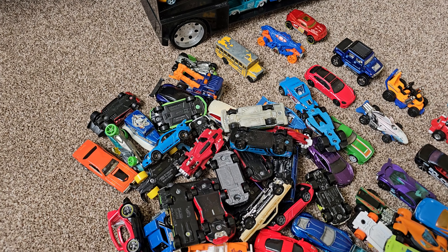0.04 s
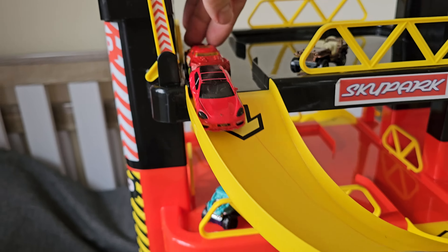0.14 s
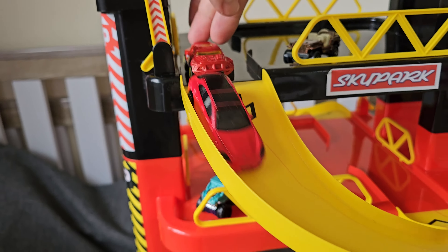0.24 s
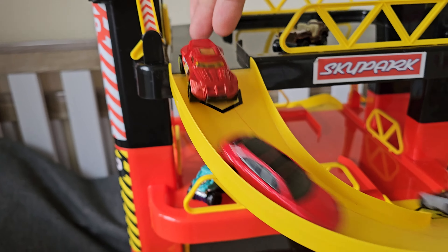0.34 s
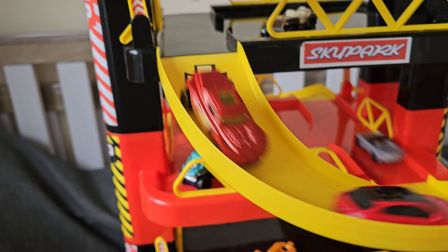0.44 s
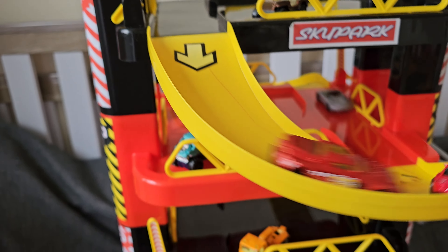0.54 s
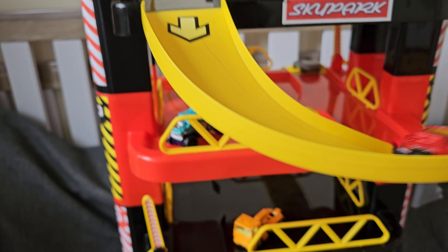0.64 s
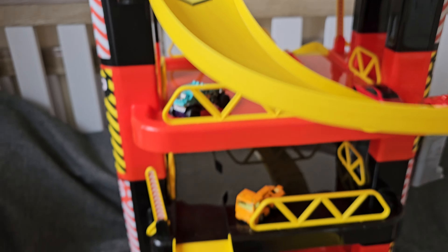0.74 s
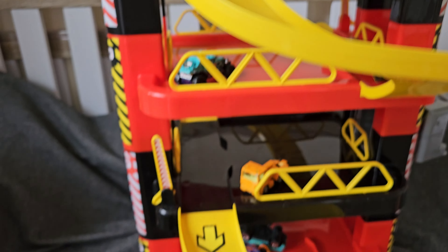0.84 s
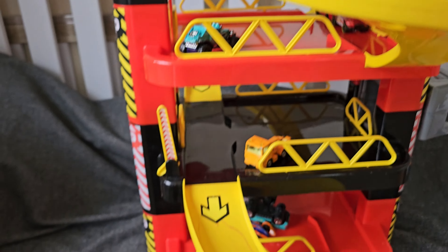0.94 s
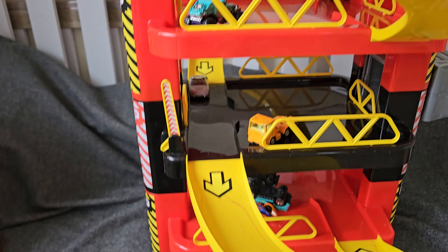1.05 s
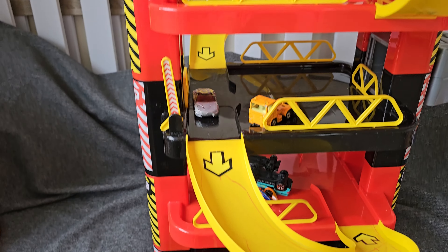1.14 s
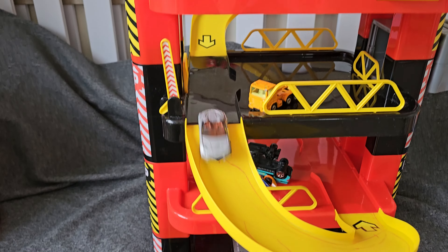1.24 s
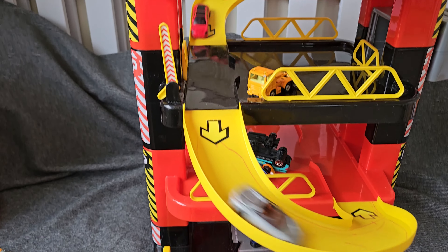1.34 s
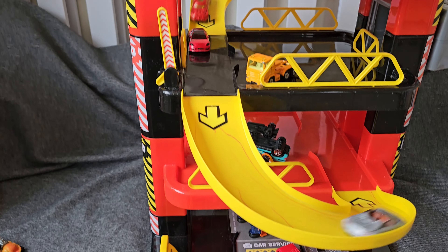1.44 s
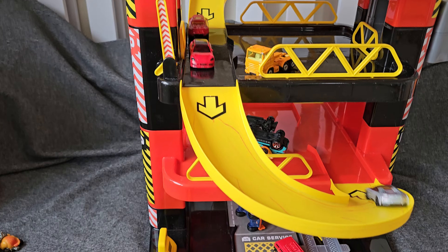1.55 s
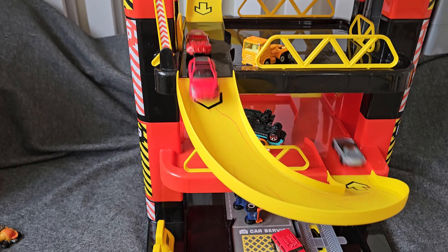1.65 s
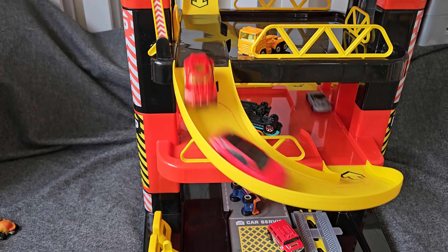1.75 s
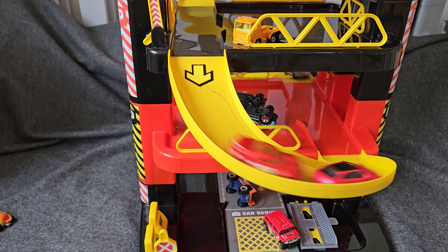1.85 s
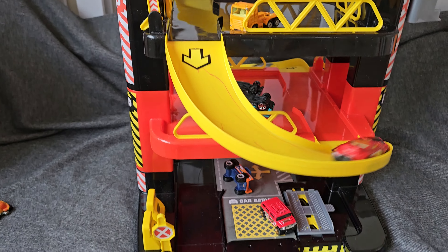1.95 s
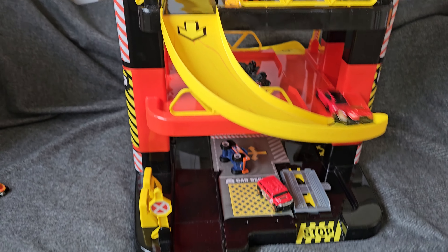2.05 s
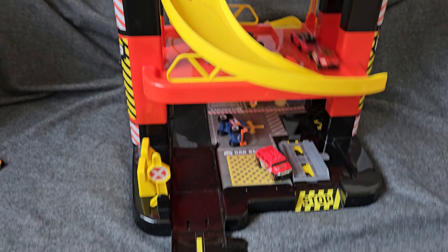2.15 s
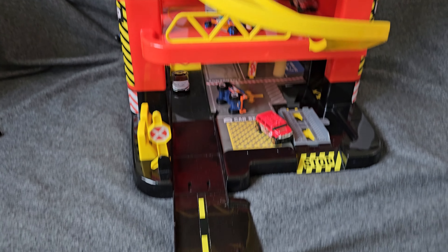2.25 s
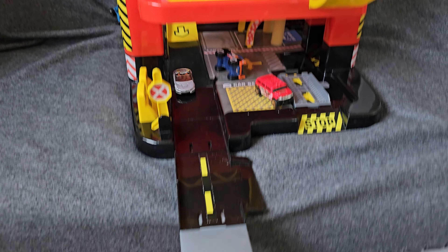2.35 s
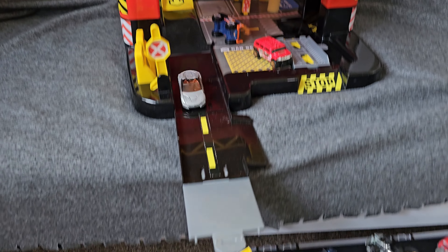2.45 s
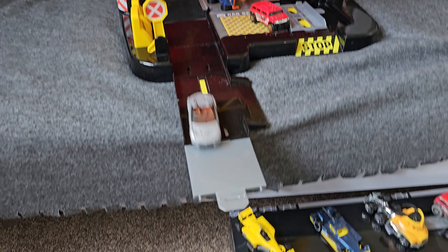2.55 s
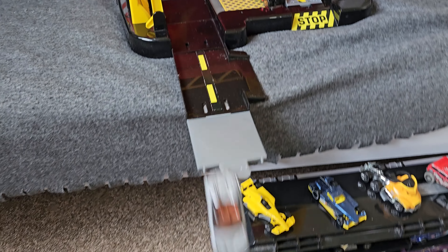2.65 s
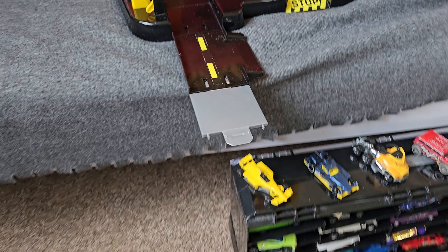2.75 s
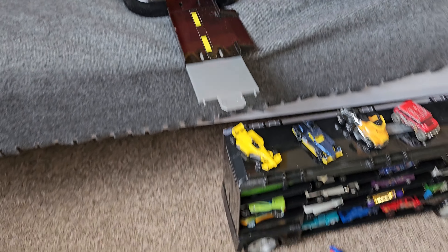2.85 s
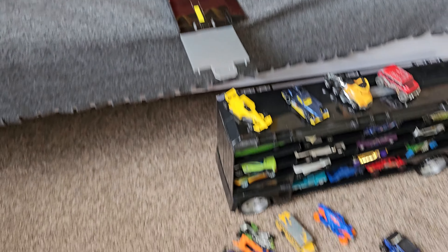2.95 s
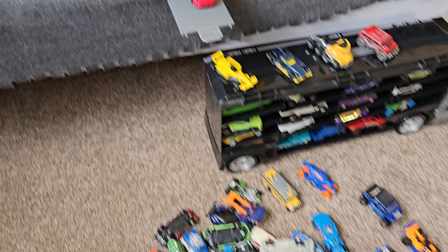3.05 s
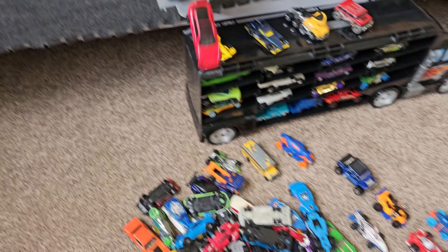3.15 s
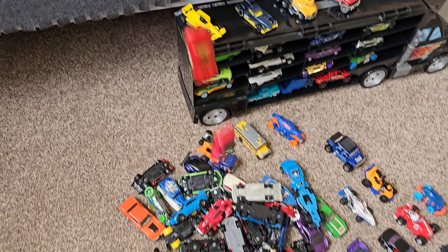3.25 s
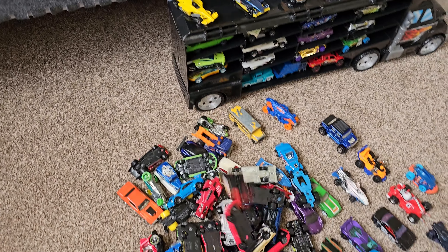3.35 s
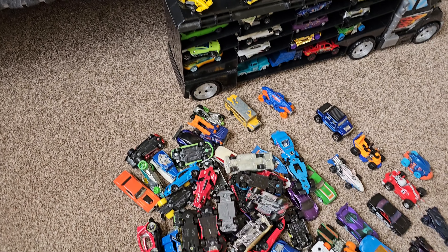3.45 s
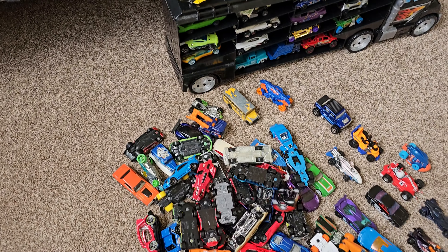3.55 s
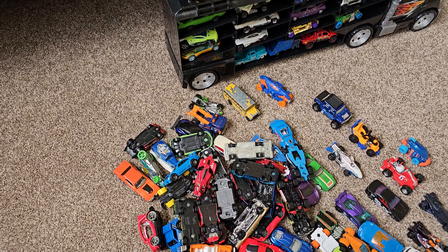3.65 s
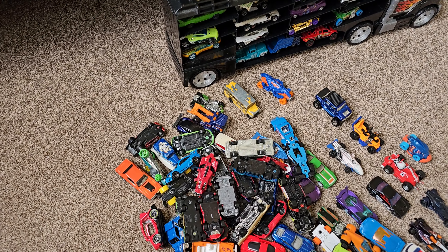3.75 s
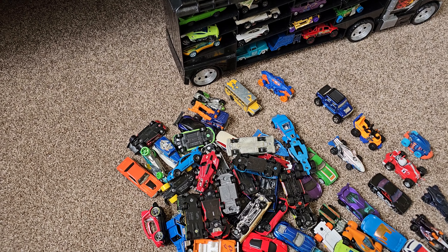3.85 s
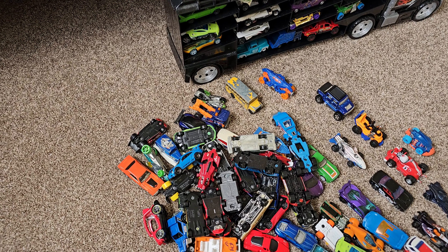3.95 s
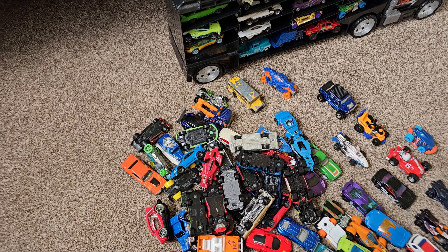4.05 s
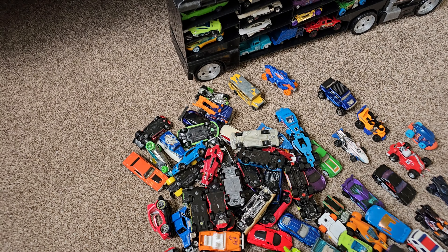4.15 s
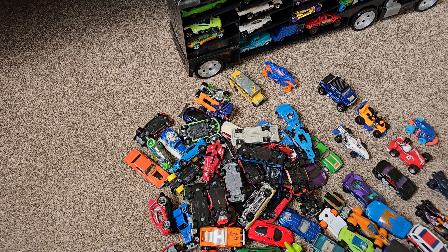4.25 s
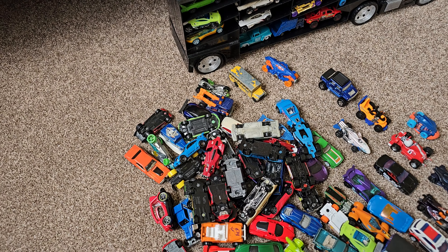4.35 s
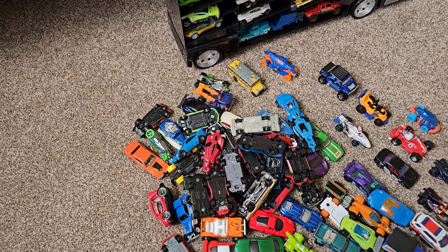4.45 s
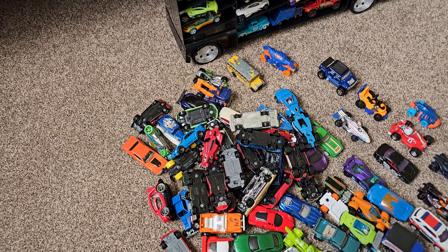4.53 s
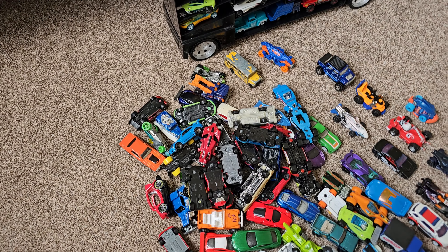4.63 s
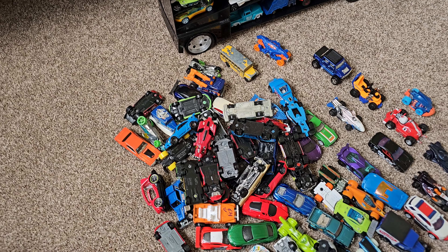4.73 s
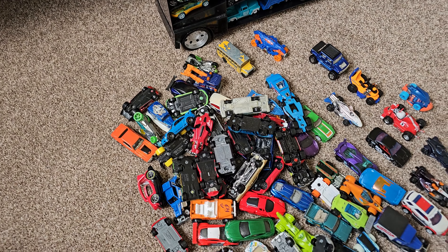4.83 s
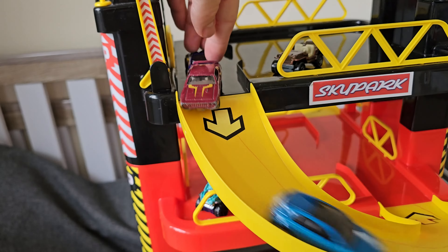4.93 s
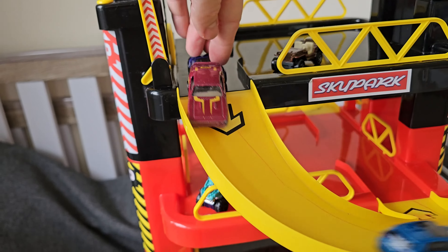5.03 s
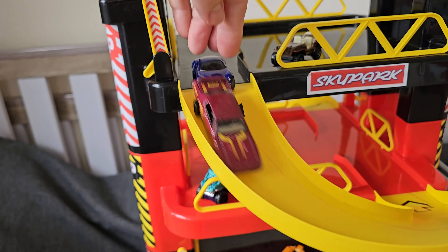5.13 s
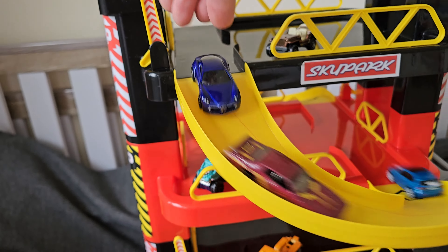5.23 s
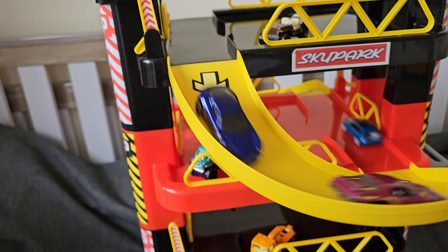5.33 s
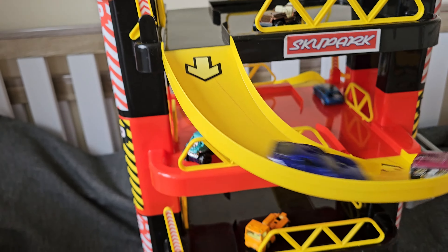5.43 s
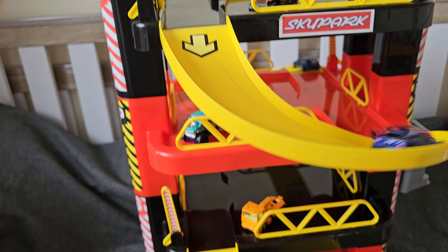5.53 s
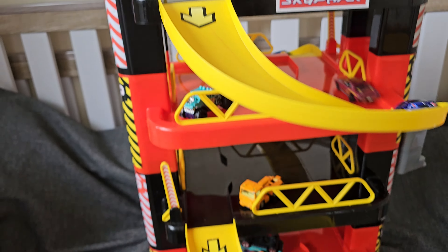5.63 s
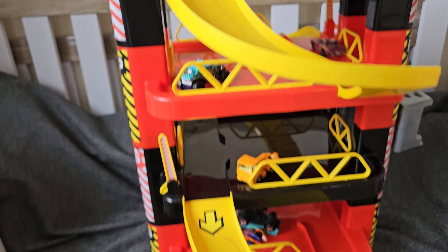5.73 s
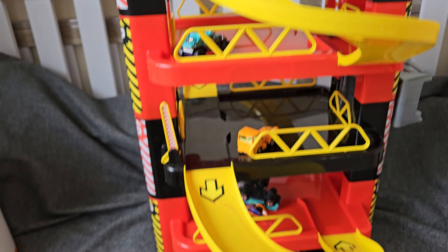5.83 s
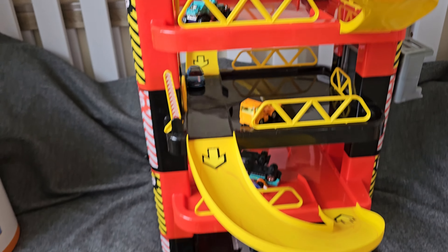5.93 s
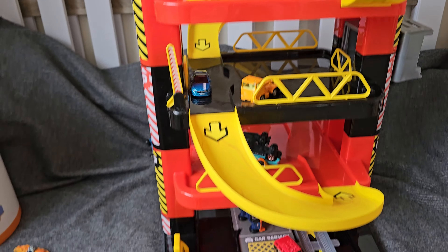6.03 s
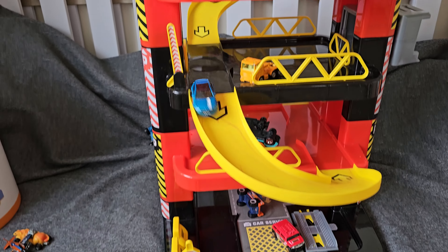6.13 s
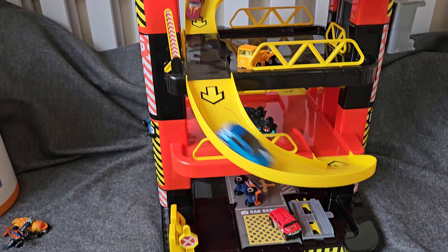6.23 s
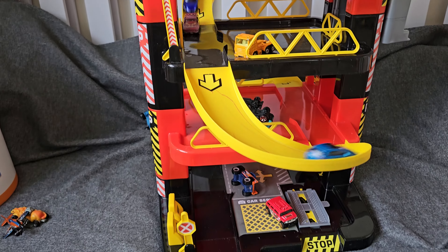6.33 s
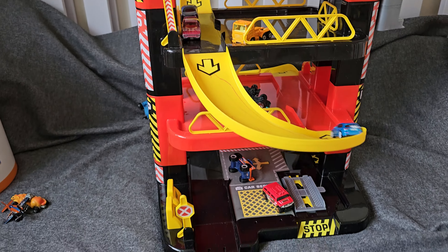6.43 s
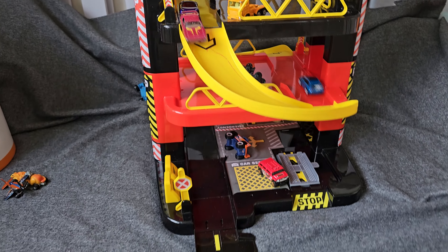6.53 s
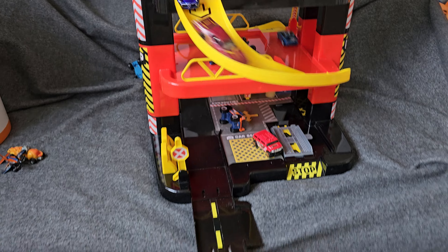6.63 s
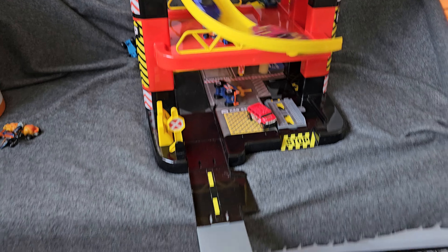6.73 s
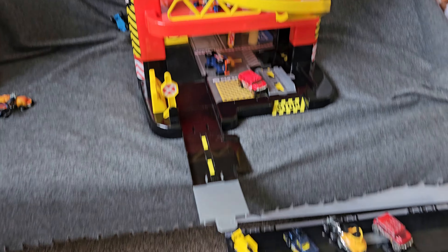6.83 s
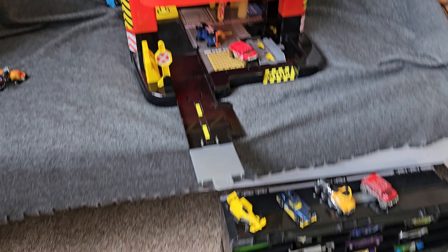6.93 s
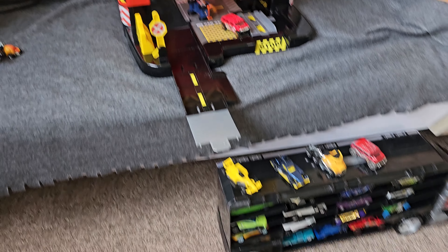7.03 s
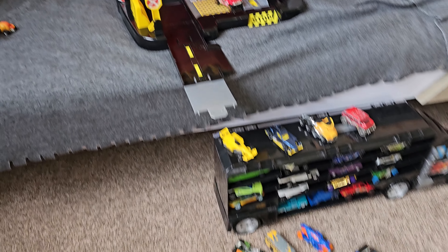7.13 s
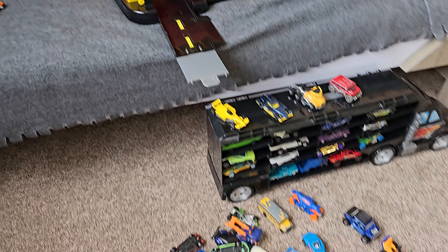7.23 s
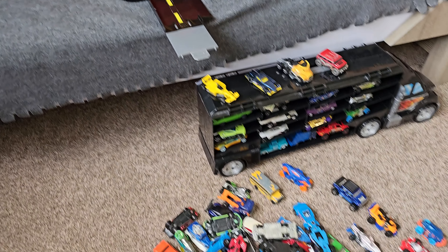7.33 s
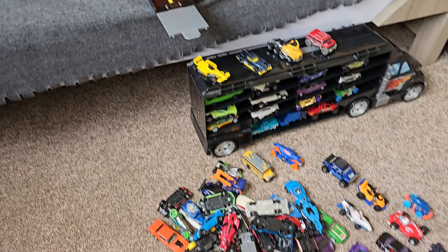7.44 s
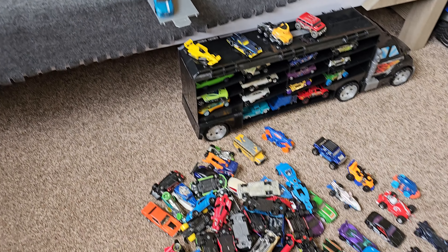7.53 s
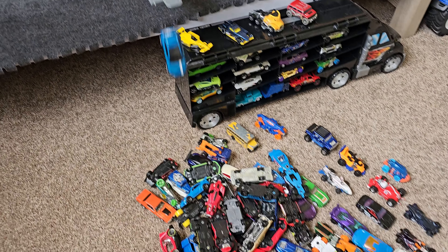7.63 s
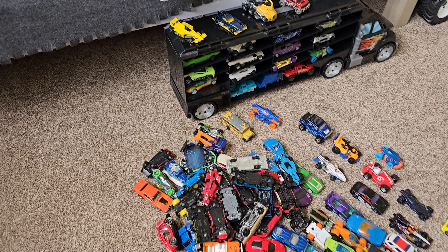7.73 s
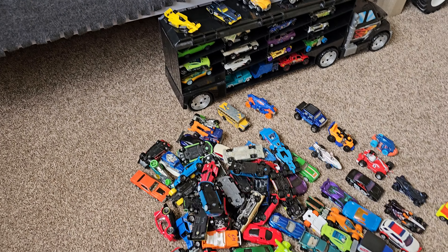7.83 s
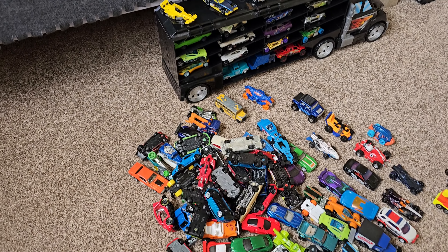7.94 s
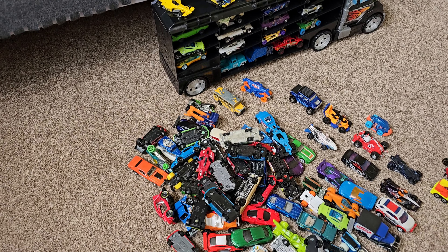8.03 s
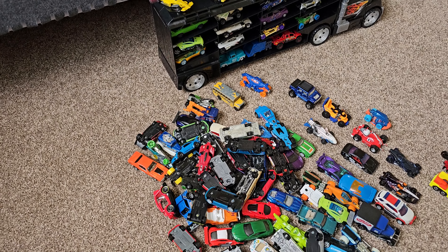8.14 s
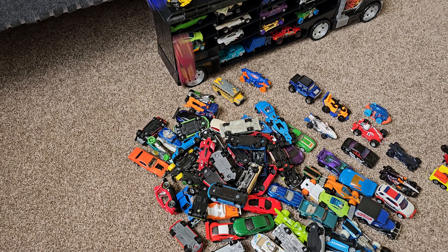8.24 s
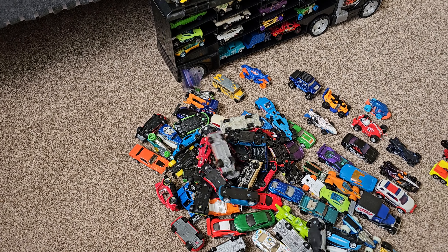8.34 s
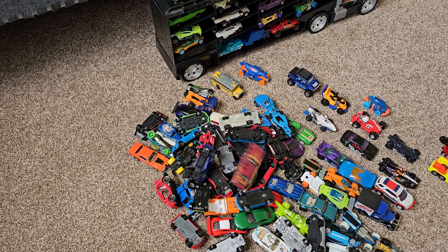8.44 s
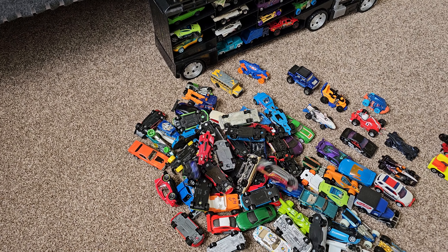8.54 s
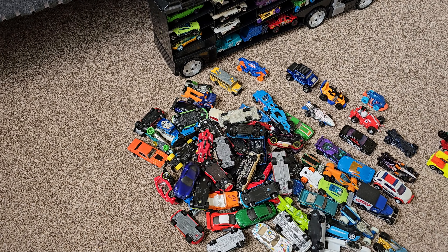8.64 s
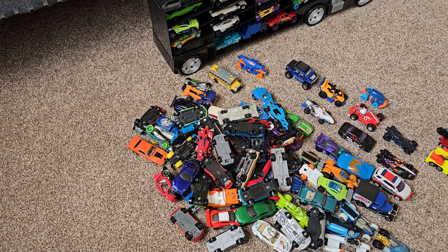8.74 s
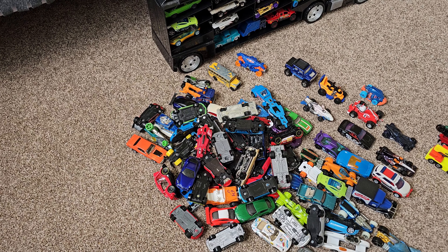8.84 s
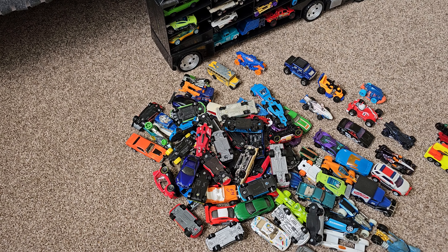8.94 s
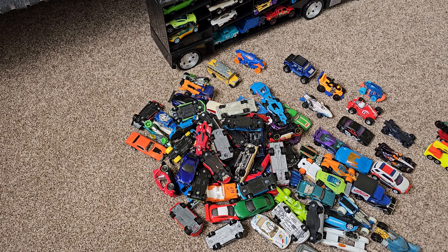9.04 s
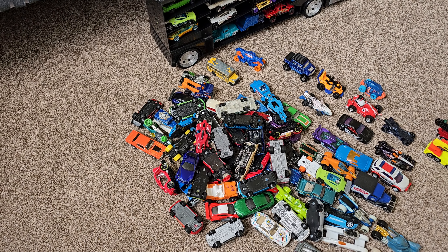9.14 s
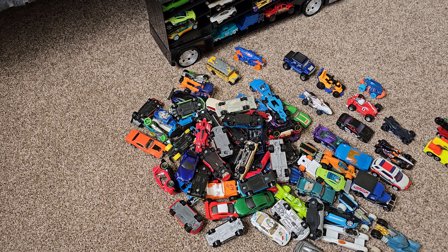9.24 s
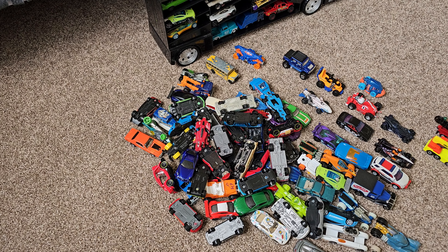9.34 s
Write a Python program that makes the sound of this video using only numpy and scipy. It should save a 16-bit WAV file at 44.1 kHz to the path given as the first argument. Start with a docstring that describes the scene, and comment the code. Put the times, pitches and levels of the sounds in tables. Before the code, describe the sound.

Close stereo pickup indoors, with faint low hum and soft room air. Die-cast cars roll down a hollow plastic chute, their wheels and loose axles chattering, decks drumming under each drop. Sharp cracks, plastic clacks and ringing metal end the run as the cars tumble into others. Small dry ticks fill the lull, then another rattling descent follows, with a final scattered pile-up fading to quiet.

```python
"""A quiet room with a low hum and dry handling ticks close to the microphone; more ticks come between runs.
Then die-cast toy cars, three a run, roll down a plastic spiral garage on carpet; a second run follows.
Wheels and loose axles rattle by crowds of clicks, chutes and hollow decks sound with them, joints boom.
At the bottom the cars fly off, strike a plastic carrier case and tumble into a pile of other metal cars:
noise bursts and ringing modes. A furnished room and two microphones, the left one brighter, take it all in."""
import sys
import numpy as np
from scipy import signal
from scipy.fft import rfft, irfft
from scipy.io import wavfile

SR = 44100
rng = np.random.default_rng(int(sys.argv[2]) if len(sys.argv) > 2 else 0)


def digitize_waveform(pressure):
    """Quantize a signal to 16-bit integers and store it at the path in sys.argv[1].

    Rows of a 2-D input are taken as channels; values are limited to [-1, 1].
    """
    field = np.atleast_2d(pressure).T
    bounded = np.clip(field, -1, 1)
    quanta = np.round(bounded * 32767).astype(np.int16)
    wavfile.write(sys.argv[1], SR, quanta)


N = 413658
TIME = np.arange(N) / SR   # seconds

# Colour of the room air. Each row: frequency in Hz, relative density in dB per Hz.
HUSH = [(25, -2), (65, -4), (85, 0), (105, -7), (140, -16), (220, -20.5), (450, -31), (1500, -35.5),
        (7400, -37.5), (8800, -58), (16000, -63)]
# Level of air and hum, lowest near the start of each run. Each row: time in seconds, level in dB.
HUSH_DB = [(0, -71), (0.2, -78.5), (3.7, -68), (4.6, -65), (4.94, -64), (4.96, -88.5), (8.3, -63.5),
           (9.38, -65)]
HUM_HZ = 88
# Faint handling ticks near the microphone. Each row: start in seconds, nominal peak in dB,
# nominal level of the soft thump in dB.
TICKS = [(0.121, -61, -65), (4.121, -45, -56), (4.15, -48.5, -57.5), (4.171, -51, -61.5), (4.364, -45, -64),
         (4.403, -58, -76.5), (4.496, -58, -71), (4.562, -46, -66), (4.591, -47, -59.5), (4.609, -40, -52),
         (4.631, -42, -50.5), (4.813, -32.5, -71), (9.1722, -51, -72)]
# Colours of the dry tick and of its thump. Each row: frequency in Hz, relative density in dB per Hz.
TICK = [(100, -5), (300, -4.5), (480, -4.5), (750, -4), (1250, 8), (1700, -1), (2300, -3), (3200, -1.5),
        (7000, -1.5), (15000, -24)]
THUMP = [(40, 2), (120, 5), (250, -5.5), (350, -20), (490, -6), (700, -19), (2000, -43)]

# The two runs. Each row: abrupt start of the rolling in seconds, first car on the carrier's lid in seconds,
# last car off it in seconds.
RUNS = [(0.18, 2.83, 3.307), (4.996, 7.783, 8.305)]
# How hard the cars roll, one curve a run; in the bends they lean on the chute.
# Each row: time in seconds, level in dB, chute over axles in dB.
ROLLING = [
    [(0.18, -37.5, -2.5), (0.32, -34.5, -2.5), (0.4, -32, 1), (0.73, -32, -1), (0.88, -34, 7),
     (1.05, -32.5, -0.5), (1.26, -33.5, 1.5), (1.38, -30, 1), (1.66, -33, 2.5), (1.82, -30, 0.5),
     (2.05, -30.5, 1), (2.14, -34, 5), (2.45, -33, -2.5), (2.78, -36, 1.5), (2.95, -35, -0.5),
     (3.17, -41, -3), (3.29, -67, -10.5)],
    [(5.0, -33.5, 0), (5.1, -35, -1.5), (5.23, -31.5, -1), (5.58, -34, -0.5), (5.68, -28.5, 5),
     (5.83, -37.5, 4), (5.9, -31.5, -0.5), (6.0, -34.5, -0.5), (6.42, -30, -0.5), (6.62, -35, -3),
     (7.05, -32, -0.5), (7.2, -36, 1), (7.55, -36, -1.5), (7.98, -33, -3), (8.17, -41.5, -0.5),
     (8.29, -62.5, -3)],
]
# Colours of axles, chute, hollow deck, base plate and tower frame.
# Each row: frequency in Hz, relative density in dB per Hz.
AXLE = [(1760, -29.5), (3000, 0.5), (5710, -4.5), (7510, -3.5), (10400, -15), (11700, -14.5),
        (15100, -18.5), (16000, -26.5)]
CHUTE = [(460, -28), (780, -2), (1750, -2), (2180, 0.5), (3300, -6.5), (4290, -31), (7260, -120)]
DECK = [(150, -35), (300, -2), (380, -3), (450, 1), (485, -1.5), (520, 3), (560, -0.5), (640, 1.5),
        (715, -4), (795, -9), (900, -14), (1500, -41.5)]
PLATE = [(100, -30.5), (180, -8), (205, -2.5), (227, -0.5), (245, -3), (267, 1), (305, -2), (345, -10.5),
         (600, -47)]
FRAME = [(18, -39.5), (30, -11.5), (81, 3), (108, 4), (141, -4), (190, -8.5), (250, -30), (420, -120)]
# Hollow deck, base plate and tower frame, a row for each: level while rolling in dB,
# level while a deck is crossed in dB, share of a drop's depth, gain on the lid in dB, loss at the top in dB.
HOLLOW_PARTS = [(-43, -37.5, -0.3, -4, 2), (-49, -42, .7, 5.5, -1.5), (-43, -40.5, 0.2, 4, 8)]
# The hollow parts take this share of the swing about the usual rolling level.
USUAL_ROLL_DB, HOLLOW_FOLLOWS = -32.5, .7
DESCENT_S = 1.47   # the loss at the top fades out over this time
# A harder drop drums louder, by this share of its swing; once the car has left, the drumming dies away.
USUAL_BUMP_DB, CROSSING_FOLLOWS, CROSSING_T60_S = -20.5, 0.71, 0.25

# A car drops over a joint onto a deck and crosses it; depth weighs the hollow parts against each other.
# Each row: start in seconds, nominal peak in dB, crossing in seconds, depth in dB.
BUMPS = [(0.349, -24, 0.059, -5), (0.653, -24.5, .12, 4), (0.991, -22.5, 0.059, -3), (1.288, -30, 0.054, 0),
         (1.36, -17.5, 0.037, 1), (1.59, -26, 0.031, 1), (1.716, -21, 0.067, -2.5),
         (1.789, -19.5, 0.029, -4.5), (1.97, -28.5, .08, -8), (2.163, -15.5, 0.028, -2),
         (2.32, -23, 0.085, 5), (2.445, -21.5, 0.025, 9), (2.589, -16.5, 0.048, -4), (2.93, -27, .06, 8),
         (5.208, -26.5, 0.047, 3), (5.335, -26, .03, 6), (5.66, -26, 0.031, -6), (5.873, -22, 0.055, -3),
         (6.261, -23.5, 0.049, 0), (6.37, -16.5, 0.0089, -15), (6.449, -24.5, .04, 1),
         (6.798, -31, 0.009, -2), (7.066, -17, 0.026, -5), (7.096, -19, 0.037, 4), (7.371, -23, 0.038, 6),
         (7.589, -23, .12, -1), (7.787, -29, .03, 6.5), (7.916, -26.5, 0.085, 12)]
# Ringing of the hollow decks. Each row: frequency in Hz, strength in dB, time to fall 60 dB in seconds.
DECK_MODES = [(229, -10, 0.28), (266, -10, .2), (482, 1.5, 0.31), (547, 7.5, 0.052), (574, -11, .11),
              (640, -5, 0.025), (867, -4.5, 0.3)]

# A car knocks against a side wall or another car.
# Each row: start in seconds, level in dB, hardness (metal over plastic) in dB.
KNOCKS = [(0.409, -32, -3), (0.709, -30.5, -4), (0.9307, -31.5, -6), (1.0598, -29, -2), (1.359, -25.5, -4),
          (1.3763, -20.5, -3.5), (1.5171, -35, -28), (1.603, -33, 2), (1.768, -21.5, -7.5),
          (1.839, -24, -11), (1.9714, -36.5, -13), (2.059, -29, -2), (2.166, -29.5, -11.5), (2.222, -31, 0),
          (2.3605, -29.5, 9), (2.4116, -24.5, 1), (2.4458, -24.5, 2), (2.5908, -27, -10),
          (2.6417, -25.5, -7), (5.2068, -27, -6), (5.252, -28, -6), (5.3366, -31, -10), (5.6585, -33, 4),
          (5.916, -33, 2), (6.2597, -28.5, -8), (6.3732, -23.5, -12), (6.449, -28, -16), (6.6834, -27, -11),
          (7.3347, -29, 9), (7.3714, -31, 15), (7.4186, -30.5, 3)]
KNOCK_PEAK_DB = 13   # nominal peak of the contact, over the level of the knock
# Colours of hard contacts and of the cars' metal. Each row: frequency in Hz, relative density in dB per Hz.
CRACK = [(100, -11.5), (700, -11), (1300, -3), (2700, -2), (4100, 7.5), (5200, -11), (7500, -6),
         (11000, -8), (16000, -2.5)]
METAL = [(1000, -37), (2400, -14), (3800, 6), (5200, 7), (7500, 9), (10500, -1.5), (12000, -1),
         (14000, -4.5), (16000, -15.5)]

# A metal part pings, in the rattle or in a crash. Each row: start in seconds, level in dB, frequency in Hz.
PINGS = [(0.9304, -25.5, 6440), (1.769, -22.5, 2640), (2.164, -28, 2010), (2.9055, -33, 1970),
         (2.9266, -31.5, 2780), (2.992, -32, 2390), (3.3833, -28, 6400), (7.722, -37, 11750),
         (7.9462, -23, 3670), (8.0291, -33, 5000), (8.4955, -28.5, 6300)]

# A car lands on the carrier or the pile, bounces and settles.
# Each row: start in seconds, level in dB, hardness (metal over plastic) in dB, clink in Hz.
CRASHES = [(2.8303, -14, 2, 1863), (2.8377, -18, 9, 1950), (2.9272, -29.5, 4.5, 2750),
           (2.958, -32, 6, 2000), (3.0473, -31, 16, 7310), (3.053, -19.5, 9.5, 7300),
           (3.0638, -26.5, 10, 3470), (3.196, -41, 5, 2300), (3.308, -20.5, 10, 2100),
           (3.3185, -17.5, 2, 1910), (3.3246, -16, 10.5, 1845), (3.3646, -19, 12.5, 6500),
           (3.3829, -23, 11, 6400), (3.3986, -22.5, 17, 7600), (3.4341, -20, 11.5, 4450),
           (3.4553, -23.5, 7, 1950), (3.5008, -33.5, 2, 4570), (3.544, -31, 7, 7100),
           (3.5655, -31.5, 6.5, 6300), (3.6557, -43.5, 4, 1720), (3.6846, -55, 26, 4610),
           (3.737, -59, 20, 6470), (3.776, -55.5, -6, 4030), (3.823, -61.5, 10, 5300),
           (7.7831, -19, 8.5, 7760), (7.7936, -23.5, 6, 4210), (7.8672, -31, 4, 4970),
           (7.9205, -25.5, 1, 2490), (7.947, -31.5, 8, 3660), (7.9839, -29.5, 7.5, 3070),
           (8.1811, -41, 10, 3810), (8.2283, -43, 1, 2250), (8.306, -31, 2, 3500), (8.3235, -19, 1.5, 3800),
           (8.3442, -14.5, 3.5, 1880), (8.375, -26, -3, 3090), (8.401, -22, 19, 4050),
           (8.4089, -18, 10, 7750), (8.4244, -18.5, -2, 4290), (8.4324, -15.5, 1, 1847),
           (8.483, -22.5, 10.5, 6310), (8.4955, -23.5, 0, 6300), (8.553, -31.5, 2, 1740),
           (8.566, -22, 12, 6650), (8.604, -26.5, 9, 3550), (8.649, -28.5, 0.5, 4020),
           (8.6617, -36, 3, 2510), (8.7464, -38, -3, 2240), (8.8, -48, -2, 2200), (8.835, -58, -10, 1930),
           (8.951, -61, -12.5, 2340), (8.98, -66.5, -6, 2160)]
CRASH_PEAK_DB, CLINK_DB = 15.5, -2   # nominal crack and clink, over the level of the crash
# Thuds differ less in level than the blows: level for a blow of 0 dB, and the share.
THUD_DB, THUD_FOLLOWS = -28.5, 0.56
# Colours of the hollow carrier and of the thud. Each row: frequency in Hz, relative density in dB per Hz.
CARRIER = [(300, -16.5), (900, -17), (1300, -0.5), (1650, -4.5), (1880, -11.5), (2200, 1), (2800, -0.5),
           (4000, -2.5), (6000, -11.5), (12000, -40.5)]
THUD = [(25, -12), (50, 2), (110, -5.5), (240, -6.5), (450, -15), (900, -26), (3000, -55)]
# Ringing of the toy cars and of the carrier's stiff wall.
# Each row: frequency in Hz, strength in dB, time to fall 60 dB in seconds.
CAR_MODES = [(1204, -10.5, 0.3), (1460, -10, .35), (1930, -5.5, .13), (2820, -3, .12), (3770, -5.5, 0.13),
             (4500, -6, .1), (5500, -9.5, .1), (6300, -14.5, .2), (6530, -5, .2), (7250, -10, .18),
             (8020, -0.5, 0.21), (8580, -12, .14), (11700, -10, .09), (13300, -2.5, .1), (15540, -5.5, .08)]
CARRIER_MODES = [(1321, -9.5, 0.039), (1740, -6.5, 0.045), (1854, -2, 0.08), (1938, -2.5, .07),
                 (2000, 1.5, .06), (2170, -5, .05)]

ROOM_T60_S = .33
# Colour of the room's tail. Each row: frequency in Hz, gain in dB.
SOFT_WALLS = [(300, -0.5), (4000, -1), (8000, -1), (15000, -3.5)]
# Stereo spread at the microphones. Each row: frequency in Hz, gain of the side signal in dB.
WIDTH = [(60, -18.5), (200, -18.5), (380, -11), (700, -8), (1300, -2.5), (2400, -2), (4400, 1), (8000, 0),
         (15000, 0)]
CUTOFF_HZ = 15900   # the microphone channels carry little above this


def from_db(db):
    """Decibels to gain."""
    return np.exp(np.asarray(db) * (np.log(10) / 20))


def rms_one(x):
    """Scale to unit rms."""
    return x / np.sqrt(np.mean(x ** 2) + 1e-20)


def through(x, response):
    """Pass a sound through an impulse response."""
    return signal.oaconvolve(np.atleast_2d(x), np.atleast_2d(response), axes=-1)[:, :N]


def causal_filter(points, size=8192):
    """Minimum-phase impulse response of a (Hz, dB) curve, by folding its cepstrum."""
    hz, db = np.transpose(points)
    grid = np.maximum(np.fft.rfftfreq(size, 1 / SR), 1)
    curve_db = np.interp(np.log(grid), np.log(hz), db)
    cepstrum = irfft(np.log(from_db(curve_db)))
    cepstrum[1:size // 2] *= 2
    cepstrum[size // 2 + 1:] = 0
    return irfft(np.exp(rfft(cepstrum)))


def coloured(x, points):
    """Give a white sound a spectrum and keep its power."""
    taps = causal_filter(points)
    return through(x, taps / np.linalg.norm(taps))


def dying_noise(t60, size=22050):
    """Countless crowded modes struck at once: mid and side noise that starts at rms 1 and dies away."""
    return rng.standard_normal((2, size)) * from_db(-60 * TIME[:size] / t60)


def blows(times, level_db, sound):
    """Place a fresh sound at each time."""
    out = np.zeros((2, N))
    for s, gain in zip(times, from_db(level_db)):
        start = int(s * SR)
        one = sound()
        out[:, start:start + one.shape[1]] += gain * one[:, :N - start]
    return out


def background():
    """Quiet room air and a low hum of one pitch, which rise and dip together."""
    air = coloured(rng.standard_normal((2, N)), HUSH)
    hum = from_db(6.0) * np.sin(2 * np.pi * HUM_HZ * TIME)
    level_db = np.interp(TIME, *np.transpose(HUSH_DB))
    return (air + hum) * from_db(level_db)


def ticks():
    """Small dry ticks close to the microphone: short noise bursts, each with a soft thump."""
    s, peak_db, thump_db = np.transpose(TICKS)
    dry_contact = lambda: dying_noise(t60=0.022, size=2048)
    soft_contact = lambda: dying_noise(t60=.05, size=4096)
    tick = coloured(blows(s, peak_db - 9.5, dry_contact), TICK)
    thump = coloured(blows(s, thump_db + 6.0, soft_contact), THUMP)
    return tick + thump


def spot_ring(t60, uneven_db, size=4096, order=48):
    """The ring of one spot on a body: crowded modes, some broad groups of them stronger than others."""
    ripple = np.log(from_db(uneven_db)) * np.sqrt(2 / order)
    cepstrum = np.append(0, rng.standard_normal(order)) * ripple
    hills = np.exp(rfft(cepstrum, size))
    hills = hills / np.sqrt(np.mean(np.abs(hills) ** 2))
    return irfft(rfft(dying_noise(t60, size=size)) * hills)


def chatter(per_s, spread_db, t60, uneven_db, size=4096, count=3):
    """Uneven tiny impacts on a few spots of a body; as the cars move on, new spots ring in new ways; rms 1."""
    strengths = from_db(spread_db * np.minimum(rng.exponential(1, N), 4)) * rng.choice([-1, 1], N)
    clicks = strengths * (rng.random(N) < per_s / SR)
    spot = rng.integers(0, count, N)
    dealt = clicks * (spot == np.arange(count)[:, None])   # one row of clicks a spot
    out = np.zeros((2, N + 3 * size))
    for start in range(0, N, size):
        spots = np.array([spot_ring(t60, uneven_db, size=size) for _ in range(count)])
        block = dealt[:, None, start:start + size]
        stretch = signal.fftconvolve(block, spots, axes=-1).sum(axis=0)
        out[:, start:start + stretch.shape[1]] += stretch
    return rms_one(out[:, :N])


def deck_crossings(depth_share, size=22050):
    """After each drop a hollow part drums for as long as the car is on the deck, then dies away."""
    power = np.zeros(N)
    for s, peak_db, length, depth_db in BUMPS:
        start = int(s * SR)
        since_left = np.maximum(TIME[start:start + size] - s - length, 0)
        level_db = CROSSING_FOLLOWS * (peak_db - USUAL_BUMP_DB) + depth_share * depth_db
        power[start:start + size] += from_db(level_db - 60 * since_left / CROSSING_T60_S) ** 2
    return np.sqrt(power)


def rolling_gains():
    """Gains of axles, chute, deck, base plate and frame, led by how hard the cars roll; zero outside the runs."""
    gains = np.zeros((5, N))
    crossings = [from_db(cross_db) * deck_crossings(share) for _, cross_db, share, _, _ in HOLLOW_PARTS]
    for (start, on_lid, end), rows in zip(RUNS, ROLLING):
        on = (TIME >= start) & (TIME < end)
        t = TIME[on]
        s, *columns = np.transpose(rows)
        level_db, lean_db = [np.interp(t, s, column) for column in columns]
        height = np.maximum(1 - (t - start) / DESCENT_S, 0)   # 1 at the top floor, 0 at the bottom
        swing_db = HOLLOW_FOLLOWS * (level_db - USUAL_ROLL_DB)
        hollow = []
        for (roll_db, _, _, lid_db, top_loss_db), crossing in zip(HOLLOW_PARTS, crossings):
            steady = from_db(roll_db + swing_db + lid_db * (t > on_lid))
            hollow.append(np.hypot(steady, crossing[on]) * from_db(-top_loss_db * height))
        axle = from_db(level_db - lean_db / 2)
        chute = from_db(level_db + lean_db / 2)
        gains[:, on] = [axle, chute, *hollow]
    return gains


def rolling():
    """Hard wheels chatter on wire axles and on the track; the hollow parts ring longer than either."""
    axle, chute, deck, plate, frame = rolling_gains()
    axle_clicks = chatter(per_s=1700, spread_db=3.3, t60=.024, uneven_db=1.4, count=6)
    wheel_clicks = chatter(per_s=1150, spread_db=3.5, t60=.02, uneven_db=1.4, count=6)
    # deck, plate and frame all feel the same jolts
    jolts = chatter(per_s=1200, spread_db=2.0, t60=.04, uneven_db=0.67, count=5)
    rattle = from_db(-1.0) * coloured(axle * axle_clicks, AXLE)
    whir = from_db(-2.3) * coloured(chute * wheel_clicks, CHUTE)
    deck_drum = coloured(deck * jolts, DECK)
    plate_drum = from_db(3.0) * coloured(plate * jolts, PLATE)
    rumble = from_db(-1.0) * coloured(frame * jolts, FRAME)
    return rattle + whir + deck_drum + plate_drum + rumble


def ringing(modes, spread_db, size=16384):
    """Distinct decaying modes, with strengths and phases drawn anew for where each blow lands."""
    hz, db, t60 = np.transpose(modes)[:, :, None]
    waves = np.exp((2j * np.pi * hz - np.log(1000) / t60) * TIME[:size])

    def blow():
        """One blow, in mid and side."""
        shape = (2, len(modes))
        strengths = from_db(db.T + spread_db * rng.uniform(-1, 1, shape))
        phases = np.exp(2j * np.pi * rng.random(shape))
        return ((strengths * phases) @ waves).real
    return blow


def bumps():
    """The hollow deck booms as a car drops onto it: ringing modes and a short burst of noise."""
    s, peak_db = np.transpose(BUMPS)[:2]
    deck_ring = ringing(DECK_MODES, spread_db=3)
    wheels_land = lambda: dying_noise(t60=.04, size=4096)
    boom = blows(s, peak_db - 20.5, deck_ring)
    landing = coloured(blows(s, peak_db - 6.0, wheels_land), DECK)
    return boom + landing


def plastic_and_metal(level_db, hardness_db):
    """A hard contact puts more of a blow into the metal, a soft one more into the plastic."""
    return level_db - hardness_db / 2, level_db + hardness_db / 2


def knocks():
    """Metal meets a thin plastic wall: a tick, a short clack of the chute and a little jingle of the car."""
    s, level_db, hardness_db = np.transpose(KNOCKS)
    chute_db, metal_db = plastic_and_metal(level_db, hardness_db)
    peak_db = level_db + KNOCK_PEAK_DB
    contact = lambda: dying_noise(t60=.014, size=2048)
    wall = lambda: spot_ring(t60=.06, uneven_db=1.5)
    car = lambda: spot_ring(t60=.07, uneven_db=2)
    tick = coloured(blows(s, peak_db - 12.0, contact), CRACK)
    clack = coloured(blows(s, chute_db - 3.0, wall), CHUTE)
    jingle = coloured(blows(s, metal_db + 1.0, car), METAL)
    return tick + clack + jingle


def clinks(times, level_db, hz, t60, pair_gap=0.018, size=8192):
    """Each contact sets off one close pair of modes in the metal, the upper one half as strong."""
    out = np.zeros((2, N))
    t = np.arange(size) / SR
    for s, gain, pitch in zip(times, from_db(level_db), hz):
        phase = 2 * np.pi * rng.random((2, 2, 1))
        lower = np.sin(2 * np.pi * pitch * t + phase[0])
        upper = .5 * np.sin(2 * np.pi * pitch * (1 + pair_gap) * t + phase[1])
        clink = gain * (lower + upper) * from_db(-60 * t / t60)
        start = int(s * SR)
        out[:, start:start + size] += clink[:, :N - start]
    return out


def pings():
    """A metal part pings, in the rattle or in a crash: short wiry notes, each a decaying pair of modes."""
    s, level_db, hz = np.transpose(PINGS)
    return clinks(s, level_db, hz, t60=0.11)


def jostle(per_s, t60, size=8192):
    """The neighbours in the heap are shaken: a quickly dying shower of small contacts."""
    t = np.arange(size) / SR
    strengths = rng.uniform(-1, 1, size)
    contacts = (rng.random(size) < per_s / SR) * strengths * from_db(-60 * t / t60)
    return through(contacts, spot_ring(t60=.009, uneven_db=2))


def crashes():
    """A sharp crack, the bark of hollow plastic, jangling and ringing metal, and a thud into the floor."""
    s, level_db, hardness_db, clink_hz = np.transpose(CRASHES)
    plastic_db, metal_db = plastic_and_metal(level_db, hardness_db)
    peak_db = level_db + CRASH_PEAK_DB
    contact = lambda: spot_ring(t60=0.025, uneven_db=2.0)
    hollow_case = lambda: dying_noise(t60=0.079, size=8192)
    car_body = lambda: spot_ring(t60=0.062, uneven_db=4.0)
    heap = lambda: jostle(per_s=730, t60=.14)
    floor = lambda: dying_noise(t60=0.23, size=16384)
    car_blow = ringing(CAR_MODES, spread_db=4)
    wall_blow = ringing(CARRIER_MODES, spread_db=3, size=4096)
    crack = coloured(blows(s, peak_db - 13.0, contact), CRACK)
    bark = coloured(blows(s, plastic_db + 0.5, hollow_case), CARRIER)
    struck = blows(s, metal_db - 3.0, car_body)
    shaken = blows(s, metal_db - 8.0, heap)
    jangle = coloured(struck + shaken, METAL)
    ring = blows(s, metal_db - 22, car_blow) + blows(s, plastic_db - 10.0, wall_blow)
    clink = clinks(s, level_db + CLINK_DB, clink_hz, t60=.075)
    thud = coloured(blows(s, THUD_DB + THUD_FOLLOWS * level_db, floor), THUD)
    return crack + bark + jangle + ring + clink + thud


def room(x, wet_db, first_echo_s=0.0044):
    """A furnished room adds a short diffuse tail, a little duller than the direct sound."""
    tail = dying_noise(t60=ROOM_T60_S) * (TIME[:SR // 2] > first_echo_s)
    tail = through(tail / np.linalg.norm(tail[0]), causal_filter(SOFT_WALLS))
    return x + from_db(wet_db) * through(x, tail)


def scene():
    """Everything is carried as mid and side; long waves reach both microphones nearly alike."""
    tower = room(rolling() + bumps() + knocks() + pings(), wet_db=-6.5)
    landing = room(crashes(), wet_db=-5.0)
    mid, side = background() + ticks() + tower + landing
    return mid + through(side, causal_filter(WIDTH)) * [[1], [-1]]


def record(dry):
    """The left microphone is the brighter one; peaks are clipped at full scale, then the top is cut."""
    left = through(dry[0], causal_filter([(500, 0.067), (7000, 0.18), (12500, 5.7)]))   # (Hz, dB)
    right = through(dry[1], causal_filter([(500, -0.39), (7000, -1.3), (12500, 0.5)]))
    clipped = np.clip(np.vstack([left, right]), -1, 1)
    low_pass = signal.ellip(10, .1, 80, CUTOFF_HZ, fs=SR, output="sos")
    return signal.sosfilt(low_pass, clipped)


dry = scene()
out = record(dry)
digitize_waveform(out)
```